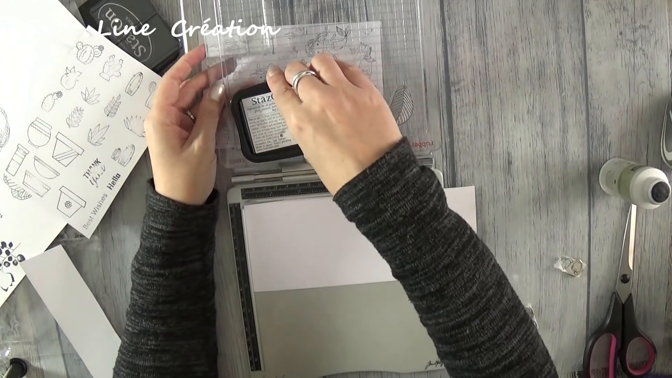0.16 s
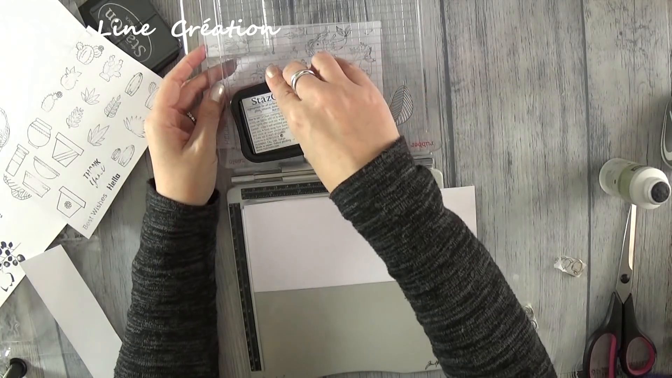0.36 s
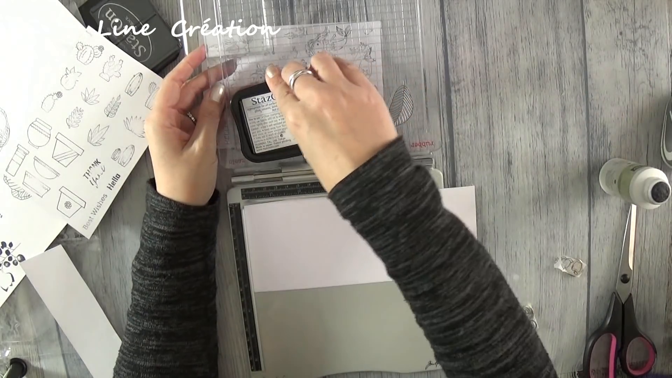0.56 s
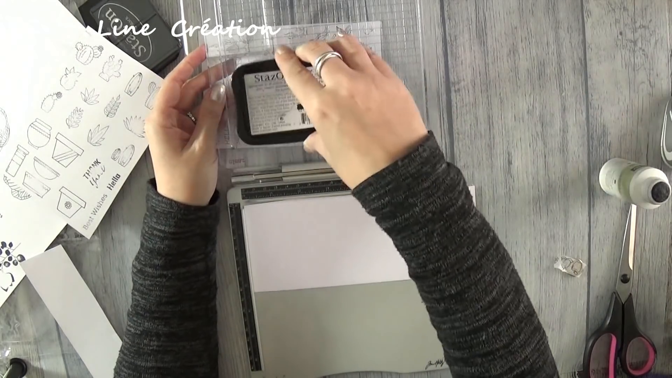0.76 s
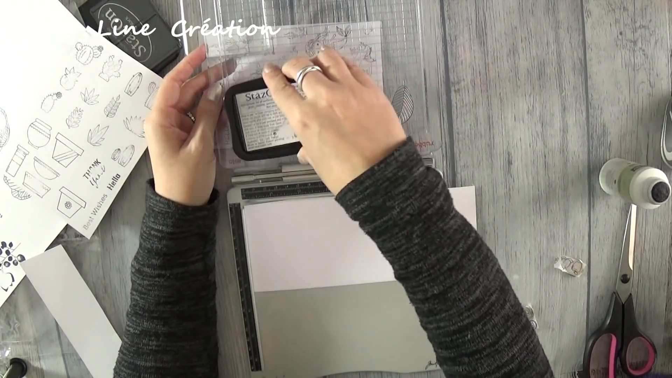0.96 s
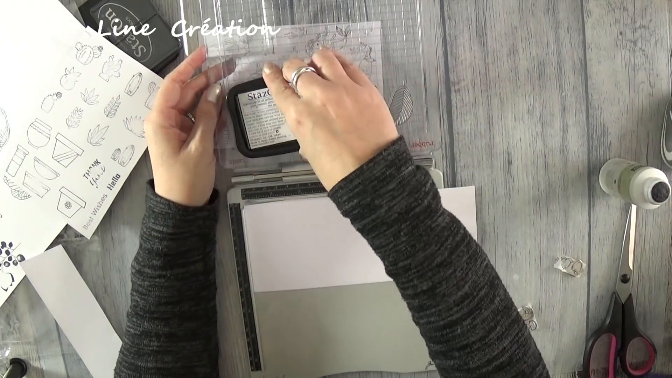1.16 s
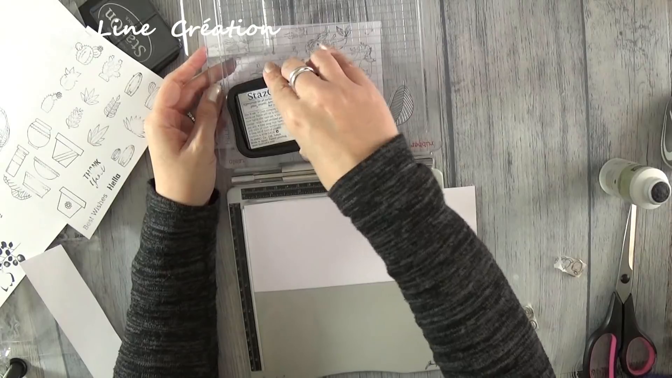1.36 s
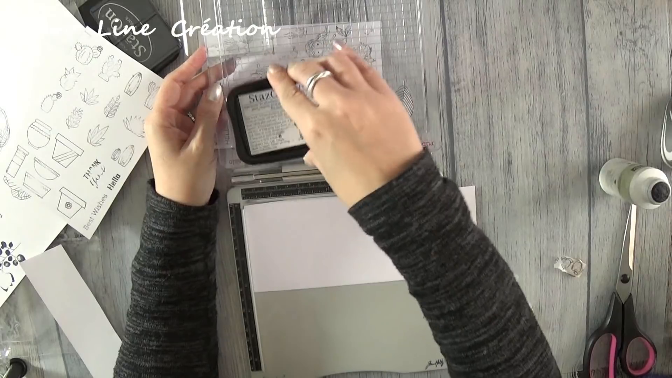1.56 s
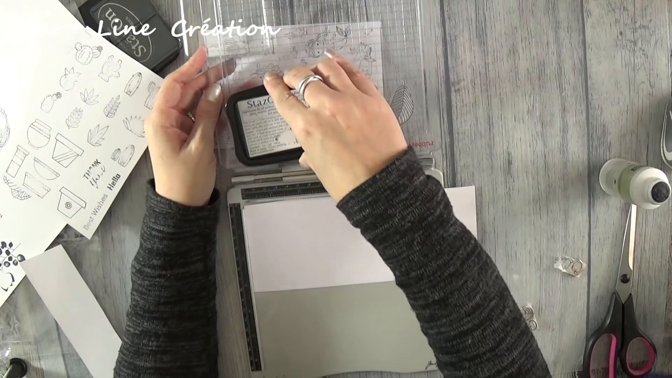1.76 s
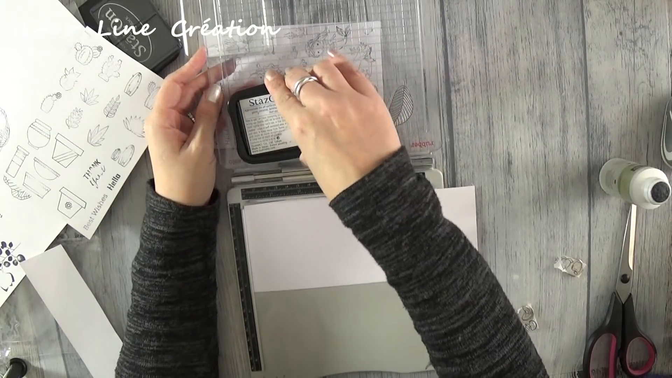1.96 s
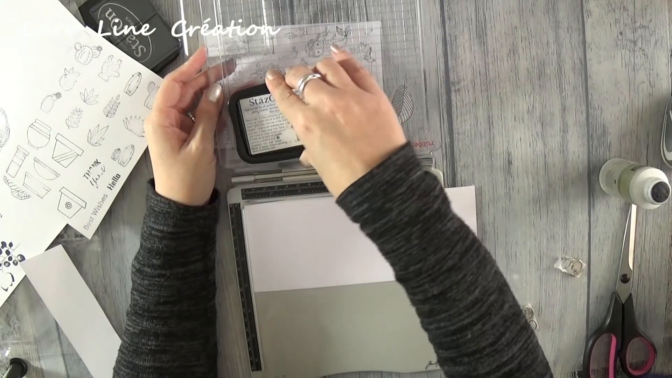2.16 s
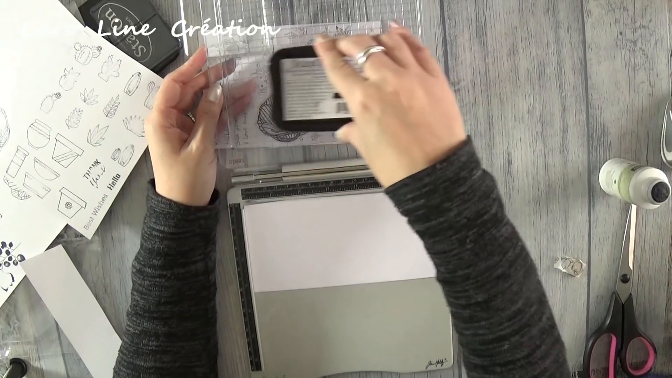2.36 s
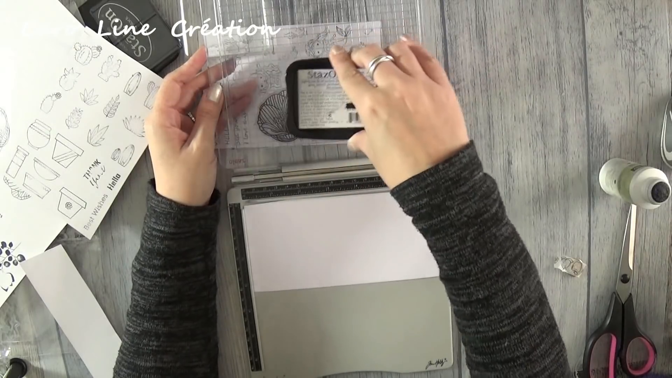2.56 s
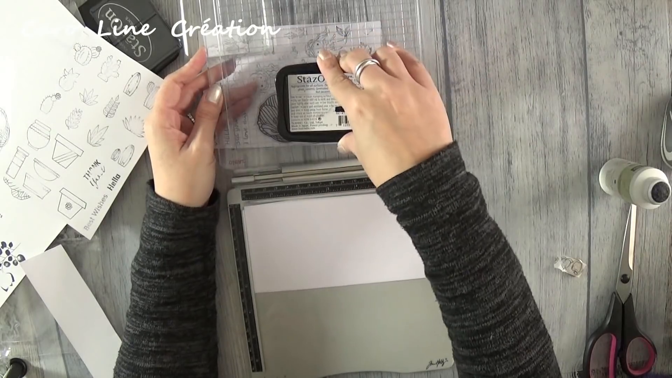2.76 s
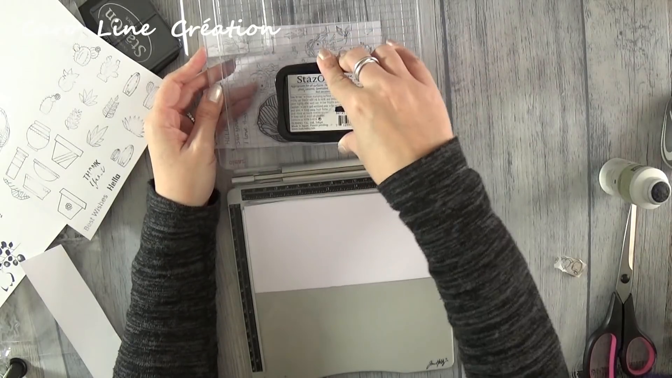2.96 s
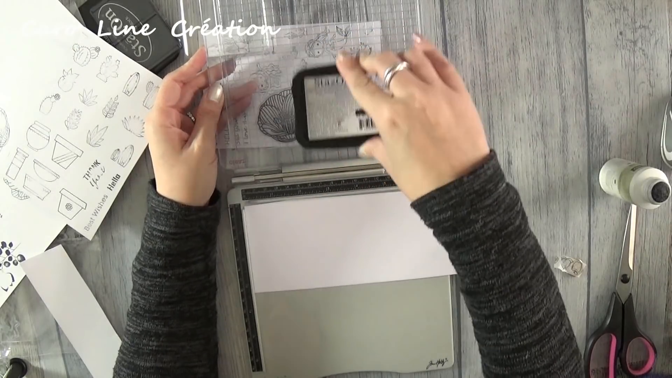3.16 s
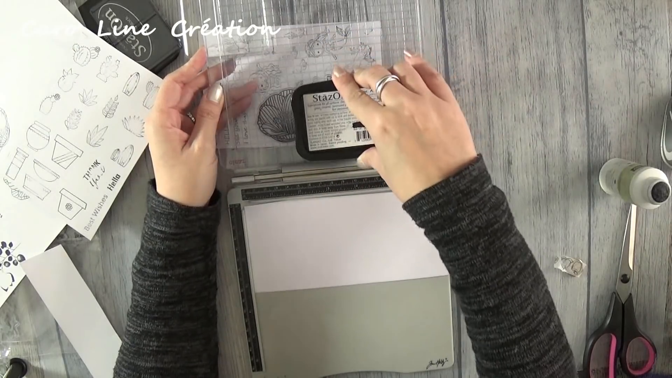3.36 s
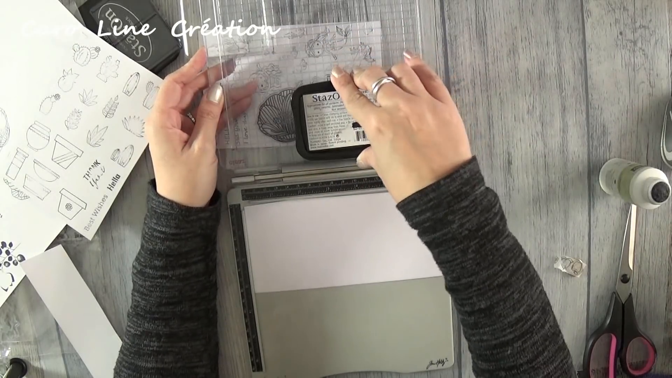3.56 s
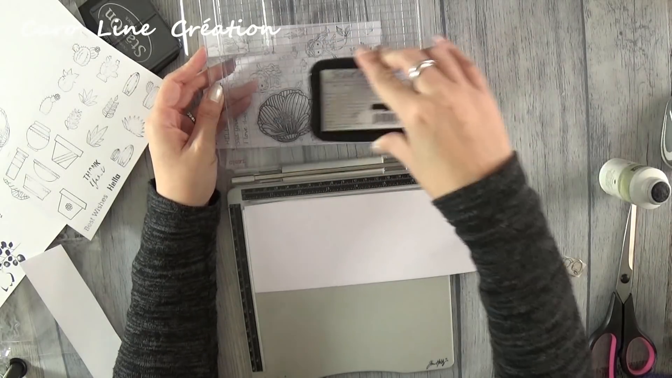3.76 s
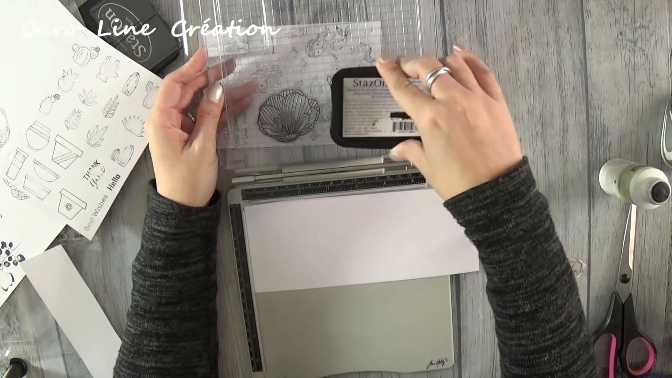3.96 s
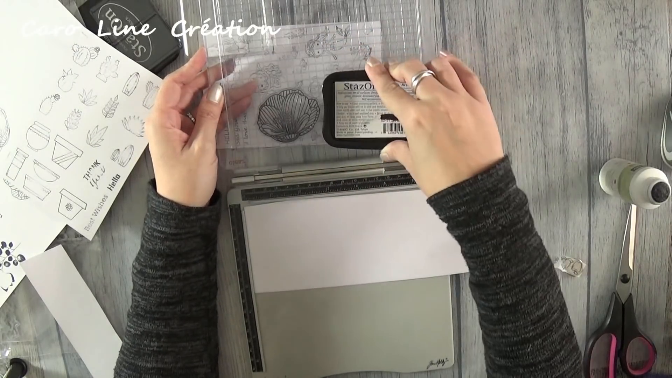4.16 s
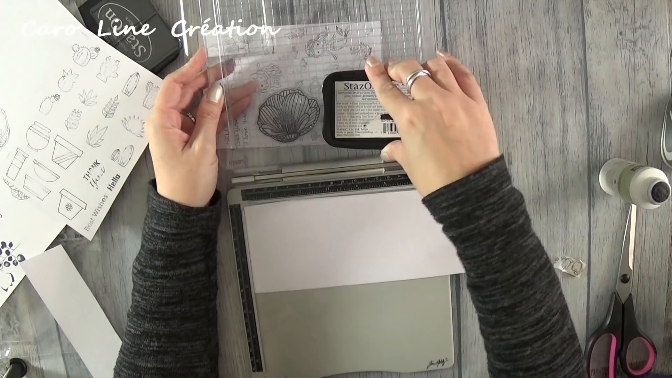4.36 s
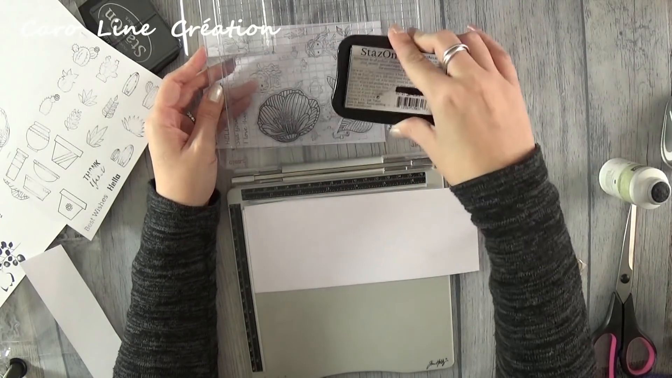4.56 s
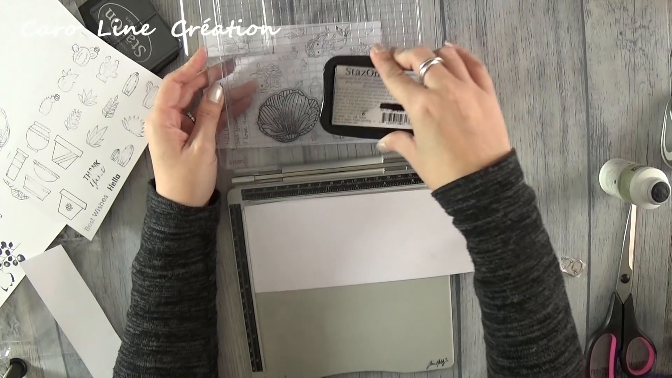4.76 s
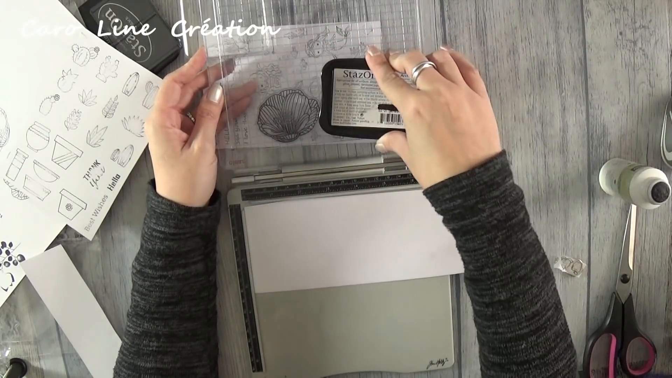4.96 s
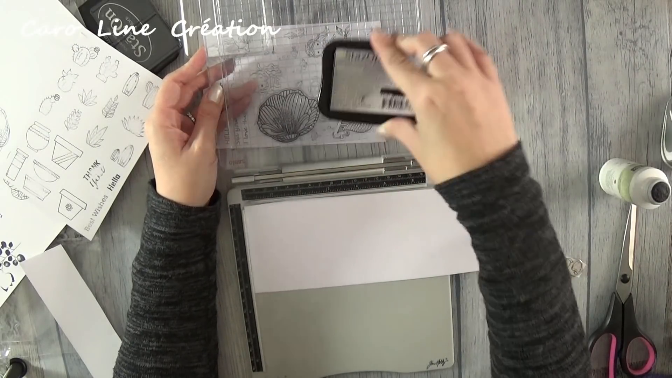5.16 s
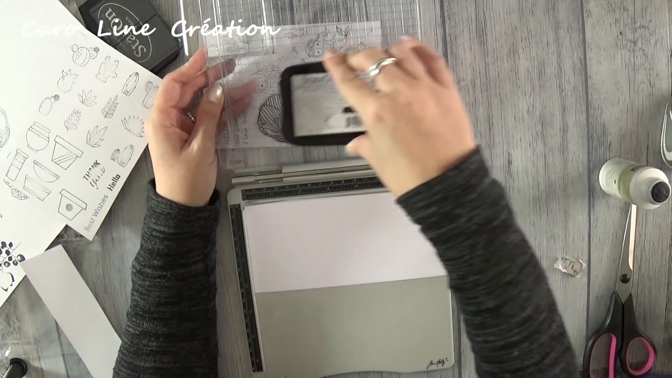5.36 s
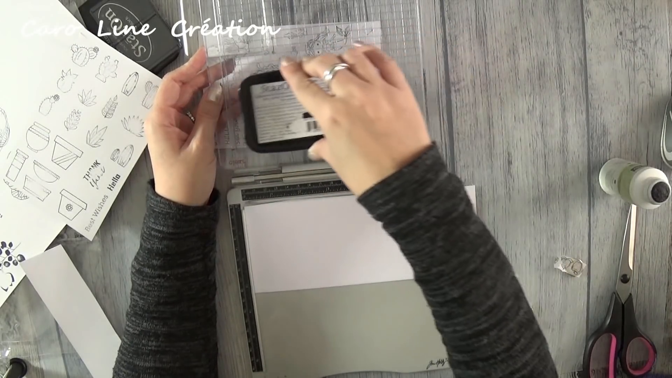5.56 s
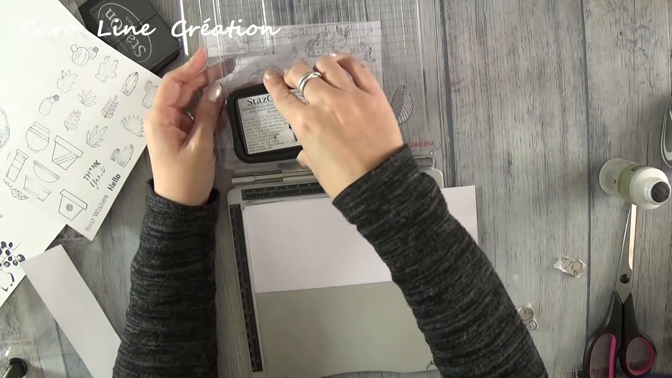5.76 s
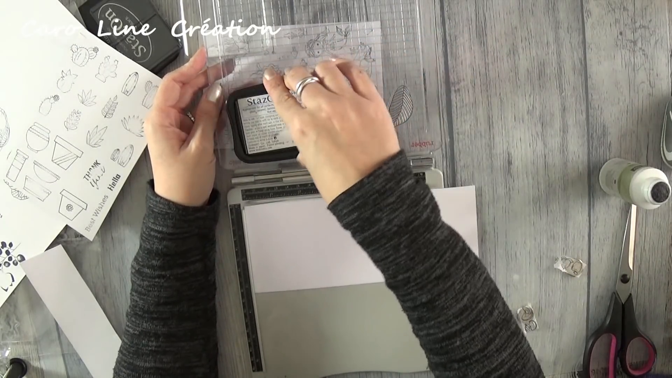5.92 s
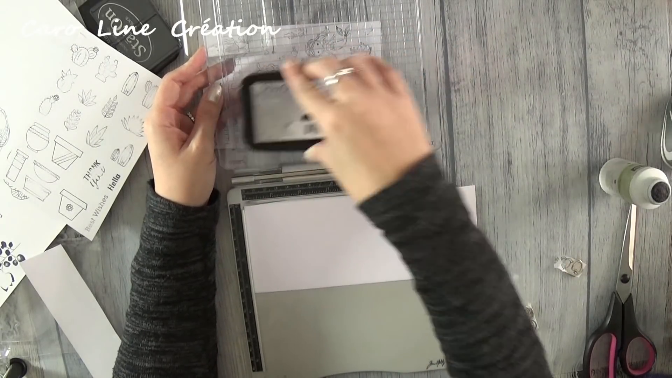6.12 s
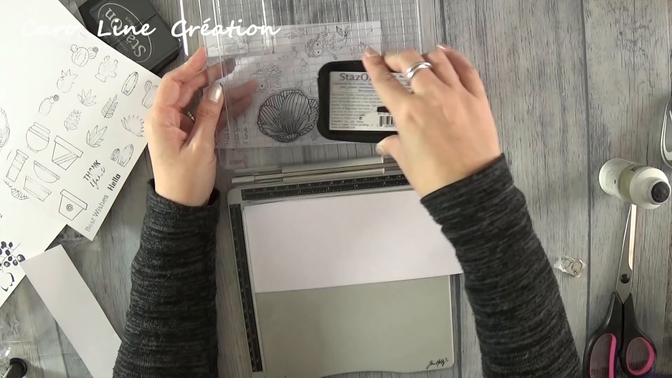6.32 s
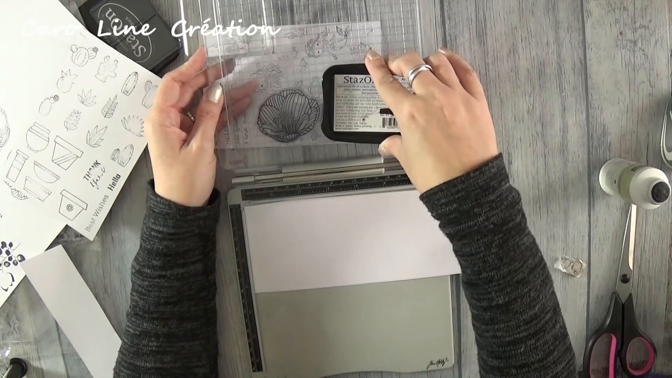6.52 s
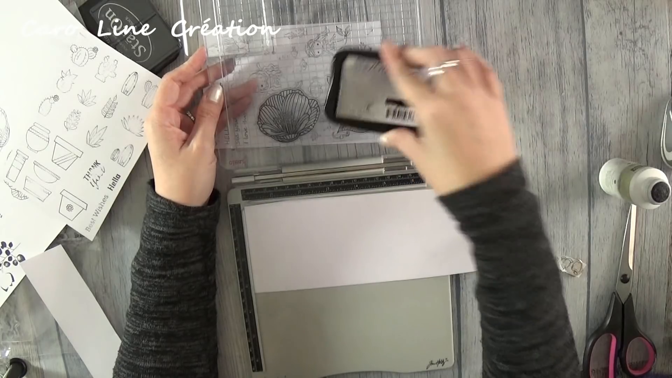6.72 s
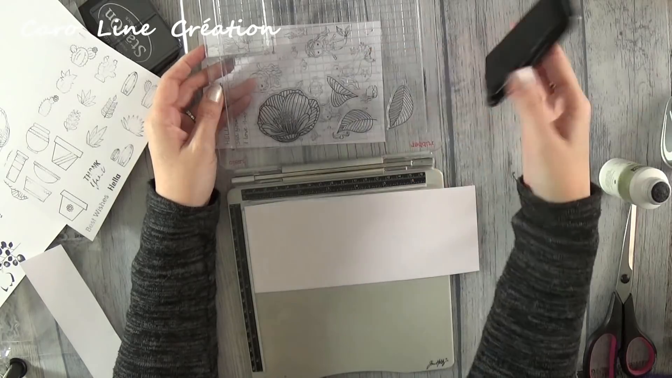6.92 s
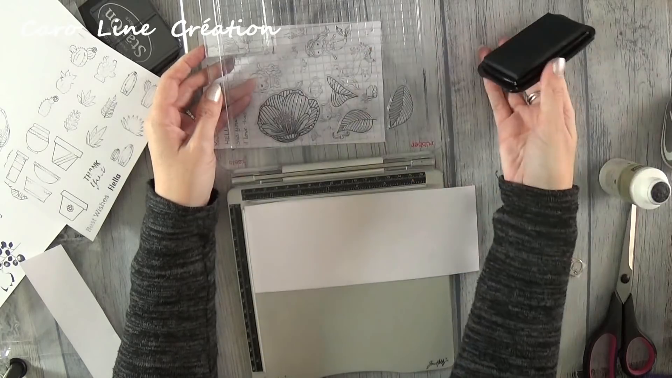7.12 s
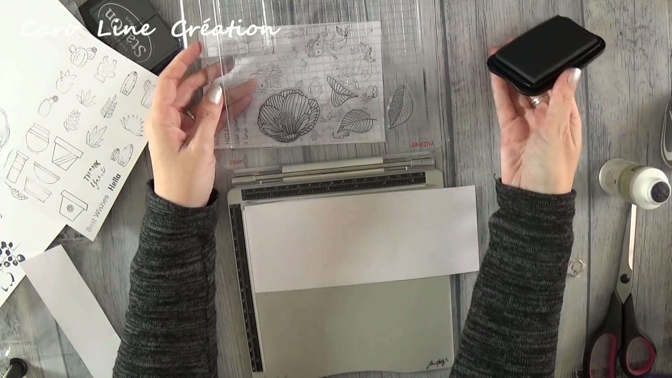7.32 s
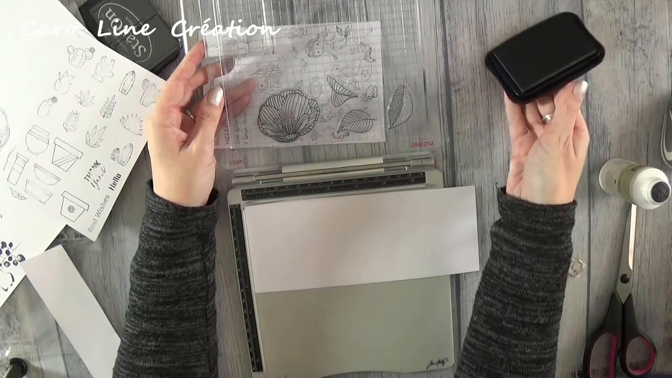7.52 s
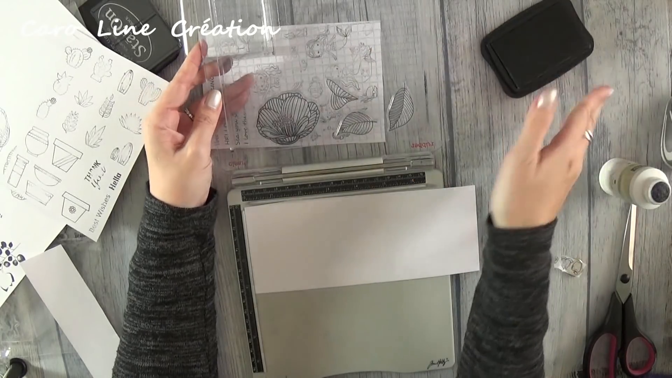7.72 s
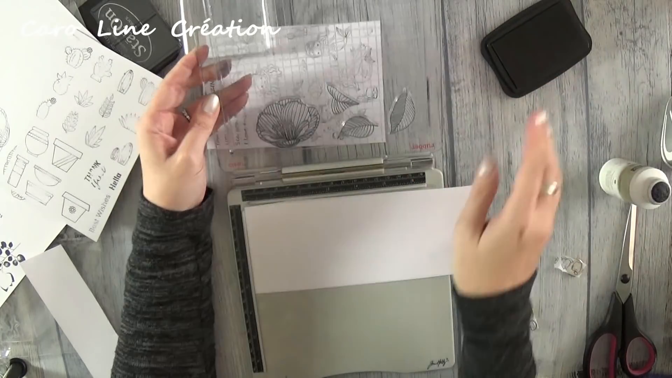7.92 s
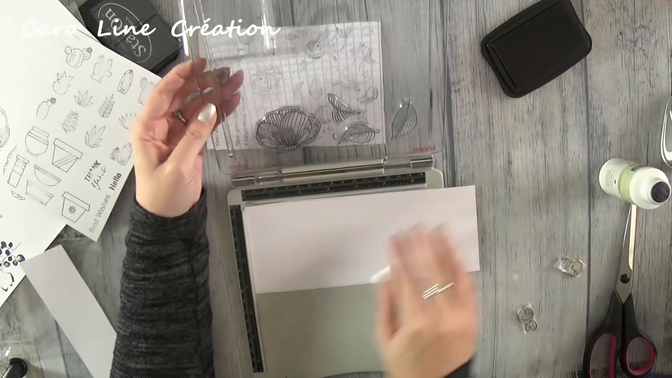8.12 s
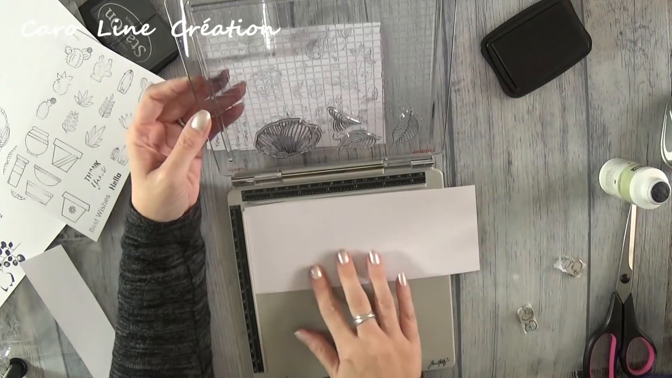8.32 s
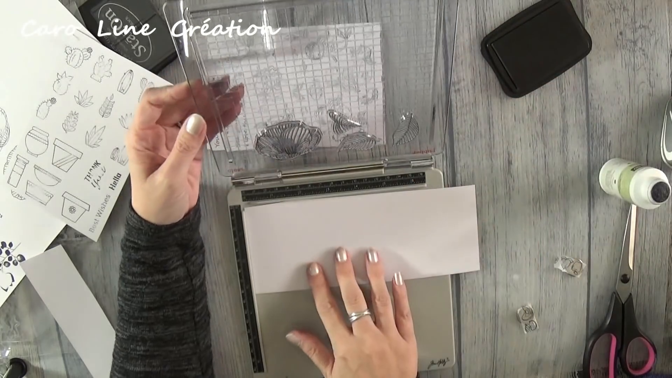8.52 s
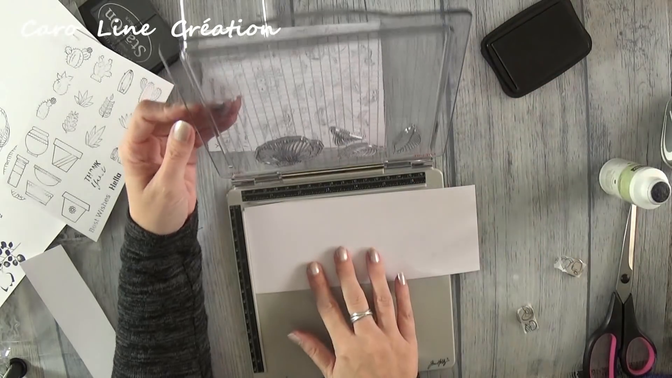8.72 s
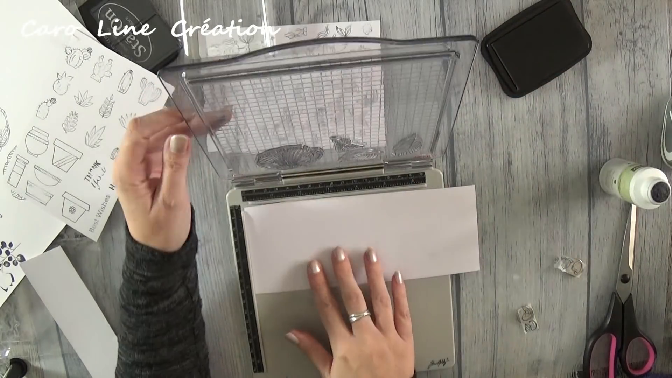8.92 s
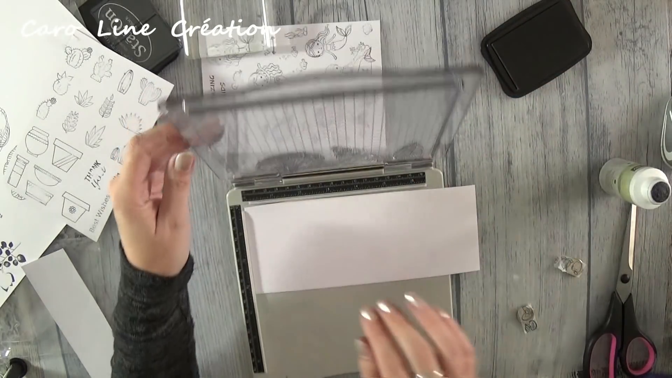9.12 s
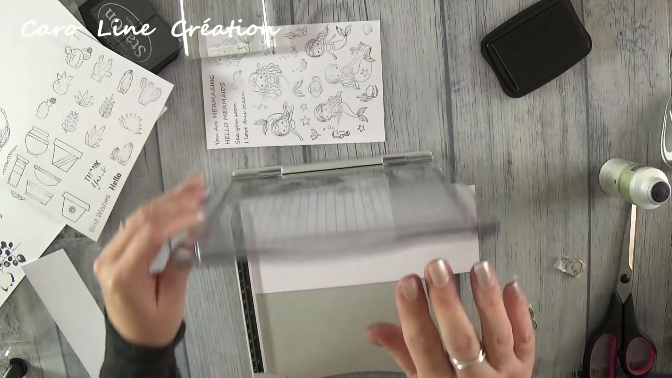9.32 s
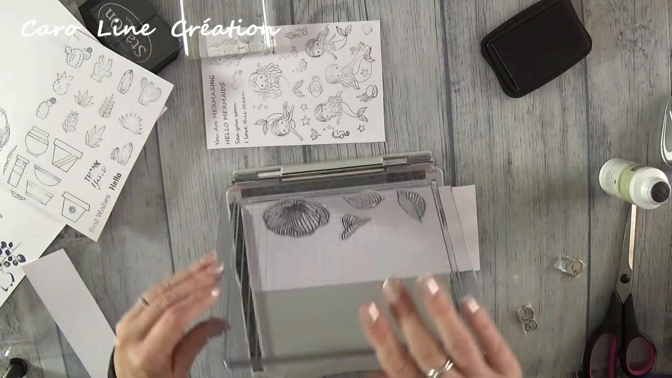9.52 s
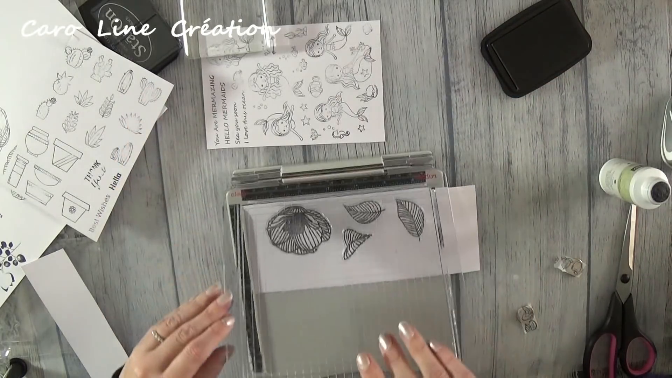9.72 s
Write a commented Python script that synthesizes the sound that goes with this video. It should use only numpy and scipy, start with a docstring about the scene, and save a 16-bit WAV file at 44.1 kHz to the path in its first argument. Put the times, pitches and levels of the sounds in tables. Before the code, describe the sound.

Soft padded taps and tacky smacks repeat at a craft table, before a hollow plastic case clacks down and a clear lid ticks over.

```python
"""An ink pad is dabbed on rubber stamps that cling to the clear lid of a stamp press, in a small room.
Each dab is a soft thud of damped lid modes; it peels off with a tacky smack of dense micro-snaps.
The pad's hollow case rings and cracks as it knocks about and bounces on its cover; small contacts tick.
Rubbing noise makes the pad's slides, a hand on paper and the lid swinging over on a ticking, creaking hinge.
Reflections surround it all, and a faint electronic whine pulses 25 times a second in the hiss."""
import sys
import numpy as np
from scipy import signal
from scipy.fft import rfft, irfft, next_fast_len
from scipy.io import wavfile

SR = 44100
rng = np.random.default_rng(int(sys.argv[2]) if len(sys.argv) > 2 else 0)


def log_audio(samples):
    """Write samples as a 16-bit WAV file to the path given in sys.argv[1]."""
    # one column per channel
    frames = np.atleast_2d(samples).T
    # limit to full scale, then quantise
    limited = np.clip(frames, -1, 1)
    pcm = np.round(limited * 32767).astype(np.int16)
    wavfile.write(sys.argv[1], SR, pcm)


N = 431298
TIME = np.arange(N) / SR
AGE = TIME[:SR // 4]  # time since a blow, s
BLOW_S = .02  # a blow's level is its energy spread over this time

# resonances of the lid on the table: [pitch_hz, relative_level_db, t60_s]
LID_MODES = [(144.8, -5, 0.096), (167.4, -2.5, 0.15), (195, -7, 0.094), (223, -10, 0.11),
             (275, -3.5, 0.055), (322, -3.5, 0.059), (395, 4, 0.055), (436, -9, 0.096), (517, -22, 0.064),
             (650.4, -5.5, 0.11), (904, 7.5, 0.025), (1050, 3, .035), (1258, -4, 0.063),
             (1460, -3.5, 0.019)]


def from_db(db):
    """Decibels to gain."""
    return 10 ** (np.asarray(db) / 20)


def rms_one(x):
    """Scale to unit rms."""
    return x / np.sqrt(np.mean(x ** 2) + 1e-20)


def at_hz(points, hz):
    """Read a table on a log-frequency axis."""
    f, value = np.transpose(points)
    return np.interp(np.log(np.maximum(hz, 1)), np.log(f), value)


def coloured(x, colour):
    """Filter a noise to a spectral curve; rms 1."""
    size = next_fast_len(N)
    hz = np.arange(size // 2 + 1) * SR / size
    spectrum = rfft(x, size) * from_db(at_hz(colour, hz))
    return rms_one(irfft(spectrum, size)[:N])


def add(out, s, db, sound):
    """Place one blow at its time and level."""
    at = round(s * SR)
    sound = sound * from_db(db) * np.sqrt(BLOW_S * SR / np.sum(sound ** 2))
    out[at:at + len(sound)] += sound[:N - at]


def ring(modes, centre_hz, focus=1.3, scatter_db=0.5, detune=0.0076, radiate=0.25):
    """Damped modes, struck a little differently each time; a contact favours those near its centre."""
    hz, db, t60 = np.transpose(modes)[:, :, None]
    strike = from_db(db + scatter_db * rng.standard_normal(hz.shape))
    gain = strike / np.hypot(1, focus * (hz / centre_hz - centre_hz / hz))
    # the highest third swings the other way
    gain = gain * np.where(np.arange(len(hz))[:, None] < 2 * len(hz) // 3, 1, -1)
    hz = hz * (1 + detune * rng.standard_normal(hz.shape))  # the grip shifts the modes
    decay = np.exp(-np.log(1000) * AGE / t60)
    vibration = np.sum(gain * np.sin(2 * np.pi * hz * AGE) * decay, axis=0)
    # small parts radiate little below their pitch
    highpass = signal.butter(2, radiate * centre_hz, "high", fs=SR, output="sos")
    return signal.sosfilt(highpass, vibration)


def crack(hz, decay_s, spread, top_hz=10500):
    """A contact: a brief, dense plastic rattle around a centre pitch."""
    fade = np.exp(-AGE / decay_s) + 1e-12
    spectrum = rfft(rng.standard_normal(len(AGE)) * fade)
    # a brief contact holds all pitches about evenly
    even = spectrum / np.abs(spectrum) ** .7
    burst = irfft(even, len(AGE)) * np.sqrt(fade)
    spread = max(spread, 1.1)
    band = signal.butter(1, [hz / spread, min(hz * spread, .45 * SR)], "band", fs=SR, output="sos")
    lowpass = signal.butter(3, min(top_hz, .45 * SR), fs=SR, output="sos")
    return signal.sosfilt(np.vstack([band, lowpass]), burst)


def grains(per_s, uneven_db):
    """Random micro-slips of uneven size."""
    sizes = from_db(uneven_db * np.minimum(rng.exponential(1, N), 4))
    return (rng.random(N) < per_s / SR) * sizes * rng.choice([-1, 1], N)


def pressure(strokes, attack_s, sag_db_per_s, release_s):
    """Each stroke swells, eases off while it lasts and dies away."""
    out = np.zeros(N)
    for s, length_s, db in strokes:
        before = np.maximum(s - TIME, 0)
        after = np.maximum(TIME - s - length_s, 0)
        held = from_db(db - sag_db_per_s * np.clip(TIME - s, 0, length_s))
        out += held * np.exp(-np.minimum(before / attack_s + after / release_s, 20))
    return out


def rub(strokes, colour, per_s, uneven_db, catch_db=2.5):
    """Friction: dense micro-slips under the level of the stroke, which catches and runs on."""
    moments = np.arange(0, TIME[-1], .009)
    catches = np.interp(TIME, moments, catch_db * rng.standard_normal(len(moments)))
    return strokes * from_db(catches) * coloured(grains(per_s, uneven_db), colour)


def hiss():
    """Room air and microphone hiss: steady coloured noise, widest in the middle of the range."""
    # spectrum of the hiss: [pitch_hz, relative_level_db]
    hiss_colour = [(30, -3.5), (80, 9), (150, -5.5), (350, -0.5), (800, 0), (2000, -4), (3500, -4),
                   (5000, -7.5), (9000, -8.5), (15500, -14)]
    # stereo width by pitch, relative only: [pitch_hz, side_over_mid_db]
    hiss_width = [(60, -8.5), (200, -9), (380, -1), (700, 1.5), (1290, 3), (2380, 0), (4400, -3.5),
                  (8120, -9), (15000, -36)]
    hiss_db, side_db = -69, -3  # side_db: whole side against whole mid
    side_colour = [(hz, at_hz(hiss_colour, hz) + db) for hz, db in hiss_width]
    mid, side = rng.standard_normal((2, N))
    mid = coloured(mid, hiss_colour)
    side = from_db(side_db) * coloured(side, side_colour)
    return from_db(hiss_db) * (mid + side * [[1], [-1]])


def whine(width_hz=35):
    """Narrow wavering electronic tones that swell in turn each cycle, alternately stronger and weaker."""
    # partials; length is the spread of a bell-shaped swell, loss applies to every second cycle:
    # [pitch_hz, level_db, moment_in_cycle_s, length_s, loss_db]
    partials = [(2073, -76.5, 0.013, 0.0069, -0.5), (2714, -73, 0.0038, 0.0034, 3),
                (2890, -80.5, 0.015, 0.0042, 1), (3364, -72, 0.003, 0.0046, 8),
                (3550, -73, 0.0029, 0.0028, 5), (4190, -71.5, 0.0049, 0.0036, 0.5),
                (8000, -91.5, .01, 0.028, -2.5), (8840, -93, .01, 0.037, 5)]
    cycle_s = .04
    out = np.zeros(N)
    smooth = signal.butter(2, width_hz, fs=SR / 50, output="sos")
    for hz, db, moment_s, length_s, loss_db in partials:
        cycle, phase_s = np.divmod(TIME - moment_s + cycle_s / 2, cycle_s)
        swell = np.exp(-.5 * ((phase_s - cycle_s / 2) / length_s) ** 2)
        gate = from_db(db - loss_db * (cycle % 2)) * swell
        slow = rms_one(signal.sosfilt(smooth, rng.standard_normal(N // 50 + 1)))
        waver = np.interp(TIME, np.linspace(0, TIME[-1], len(slow)), slow)
        out += np.sqrt(2) * gate * np.sin(2 * np.pi * hz * TIME + 0.75 * waver)
    return out


def room(x, first_s=0.001):
    """Dense reflections that die away band by band, a little different at each ear."""
    # reverberation time: [pitch_hz, t60_s]
    room_t60 = [(100, 0.45), (300, 0.17), (1000, 0.22), (2000, 0.25), (6000, 0.27), (15000, 0.26)]
    # spectrum of the reflections: [pitch_hz, relative_level_db]
    room_colour = [(70, -2), (160, -4.5), (300, 0.5), (600, -2), (1000, 0), (1800, -4.5), (4000, -2.5),
                   (10000, -3.5), (15000, -4.5)]
    # stereo width: [pitch_hz, side_over_mid_ratio]
    room_width = [(200, 0.021), (400, .14), (700, 0.23), (1500, 0.37), (4000, 0.417), (9000, 0.44),
                  (13000, 0.099)]
    room_db = -3.5
    t, edges = TIME[:SR // 2], np.geomspace(50, 18000, 13)
    spectrum = rfft(rng.standard_normal((2, len(t))))
    f = np.arange(len(t) // 2 + 1) * SR / len(t)
    onset = np.clip(t / first_s - .5, 0, 1)
    tail = 0
    for low, high in zip(edges, edges[1:]):
        hz = np.sqrt(low * high)
        fade = np.exp(-np.log(1000) * t / at_hz(room_t60, hz)) * onset
        band = irfft(spectrum * ((f >= low) & (f < high)), len(t)) * fade
        # equal energy per hertz before colouring
        band *= np.sqrt(2 * (high - low) / SR) / np.linalg.norm(band, axis=1, keepdims=True)
        mid_side = np.array([[1], [at_hz(room_width, hz)]])
        tail = tail + band * from_db(at_hz(room_colour, hz)) * mid_side
    mid, side = signal.fftconvolve(x[None], tail, axes=1)[:, :N]
    return from_db(room_db) * (mid + side * [[1], [-1]])


def swing():
    """The lid scrapes softly as it swings over."""
    # strokes of the swinging lid: [start_s, length_s, level_db]
    swing_strokes = [(8.91, 0.11, -72.5), (9.11, 0.13, -65), (9.33, 0.54, -67)]
    # spectrum of the scrape: [pitch_hz, relative_level_db]
    swing_colour = [(150, 7), (350, 7.5), (550, 3.5), (800, 3), (1200, -1), (1500, 4.5), (1850, 0.5),
                    (2800, 5.5), (4500, -3.5), (10000, -9), (15000, -30)]
    strokes = pressure(swing_strokes, attack_s=.025, sag_db_per_s=15, release_s=0.06)
    return rub(strokes, swing_colour, per_s=5000, uneven_db=1.5)


def creak():
    """Quick little slips of the hinge, halfway over, excite one resonance of the lid."""
    # creaks: [start_s, length_s, level_db]
    creak_strokes = [(9.11, 0.09, -65)]
    resonance_hz, resonance_q, slips_per_s = 1520, 14, 450
    slips = grains(slips_per_s, uneven_db=3.0) + 1e-18
    rasp = signal.lfilter(*signal.iirpeak(resonance_hz, resonance_q, fs=SR), slips)
    return pressure(creak_strokes, attack_s=.008, sag_db_per_s=5, release_s=0.013) * rms_one(rasp)


def hinge():
    """The hinge sticks and lets go as the lid comes down, and jolts the lid."""
    # slips, level before the ring and crack trims: [time_s, level_db, lid_jolt_db]
    slips = [(9.331, -56.5, -70), (9.343, -62, -60.5), (9.4035, -52.5, -68), (9.4499, -60.5, -65.5),
             (9.49, -55.5, -69), (9.54, -56, -58), (9.56, -76, -69)]
    # resonances of the hinge: [pitch_hz, relative_level_db, t60_s]
    hinge_modes = [(1100, -4, 0.017), (2300, -2, 0.02), (2540, 3, 0.02), (3600, 2, 0.014),
                   (4400, -11, .008), (6300, -17, .007), (7450, -6, 0.011)]
    slip_hz, jolt_hz = 4940, 650
    ring_db, crack_db = 1, -1
    out = np.zeros(N)
    for s, db, jolt_db in slips:
        add(out, s, db + ring_db, ring(hinge_modes, slip_hz, focus=.7, scatter_db=2.5, detune=.07))
        add(out, s, db + crack_db, crack(slip_hz, decay_s=0.0061, spread=1.8, top_hz=8700))
        add(out, s, jolt_db, ring(LID_MODES, jolt_hz, focus=3.5, scatter_db=2, detune=.05, radiate=.7))
    return out


def paper():
    """A hand brushes the sheet in the press."""
    # strokes of the hand: [start_s, length_s, level_db]
    paper_strokes = [(8.297, 0.1, -59), (8.91, 0.083, -70), (9.02, 0.042, -73)]
    # spectrum of the brushing: [pitch_hz, relative_level_db]
    paper_colour = [(200, -5), (1000, -4.5), (2500, -1), (5000, 1), (10000, 2), (13000, -1), (16000, -10)]
    strokes = pressure(paper_strokes, attack_s=0.0087, sag_db_per_s=57, release_s=0.015)
    return rub(strokes, paper_colour, per_s=25000, uneven_db=1.5)


def ticks(count=8):
    """Short contact bursts that leave the case silent: a few clear ones, and faint ones at random."""
    # clear ticks of fingers and plastic parts, and one lower creak of the swinging lid (the last row):
    # [time_s, level_db, centre_hz]
    clear = [(.0205, -63.5, 3900), (0.097, -69, 5350), (0.4857, -68, 7500), (1.7736, -69.5, 4500),
             (3.865, -64.5, 3730), (5.727, -65.5, 3870), (6.921, -66.5, 4800), (6.9596, -66, 6860),
             (7.0637, -66.5, 6000), (7.325, -66, 5500), (7.456, -59.5, 3570), (7.509, -61, 2520),
             (8.651, -64.5, 3900), (9.0857, -63.5, 3860), (9.096, -62, 1460)]
    touch_db, touch_hz, spread_octaves = -74.5, 4300, 0.32  # the faint ones
    out = np.zeros(N)
    faint = []
    for when, pitch in rng.random((count, 2)):
        hz = touch_hz * 2 ** (spread_octaves * (2 * pitch - 1))
        faint.append((when * TIME[-1], touch_db, hz))
    for s, db, hz in list(clear) + faint:
        add(out, s, db, crack(hz, decay_s=0.0041, spread=1.16, top_hz=11530))
    return out


def slide():
    """The pad turns and slides in the fingers."""
    # strokes of the pad: [start_s, length_s, level_db]
    slide_strokes = [(7.07, .13, -71), (7.38, 0.13, -69.5), (7.515, .1, -62.5), (7.67, 0.14, -57)]
    # spectrum of the sliding: [pitch_hz, relative_level_db]
    slide_colour = [(120, -55), (200, -19), (231, 4.5), (304, -9), (437, -13.5), (906, -4), (1980, 8.5),
                    (2420, 2), (4410, -2), (5300, -10.5), (8980, -3), (15500, -22)]
    strokes = pressure(slide_strokes, attack_s=0.015, sag_db_per_s=17.5, release_s=.03)
    return rub(strokes, slide_colour, per_s=2500, uneven_db=1.5, catch_db=4.5)


def case_ring(hz):
    """One stroke on the pad's hollow case."""
    # resonances of the case: [pitch_hz, relative_level_db, t60_s]
    case_modes = [(891, -1, 0.028), (1325, -10.5, 0.011), (1470, 6, 0.0073), (1644, 2, 0.026),
                  (1837, 6.5, 0.016), (2240, 2.5, 0.0059), (2710, 2, 0.014), (3115, 7, 0.015)]
    return ring(case_modes, hz, focus=2.6, scatter_db=1.5, detune=0.02, radiate=0.51)


def case_crack(hz):
    """Hard plastic meets hard plastic."""
    return crack(hz, decay_s=.0022, spread=1.6, top_hz=9500)


def drop(count=3):
    """The pad lands on its cover and bounces to rest; the first landing booms in the table."""
    # each flight is shorter and each landing weaker
    drop_s, first_flight_s, restitution = 7.7574, .0603, .35
    drop_db, bounce_loss_db, loss_power = -26.5, 6.5, 1.64
    ring_hz, crack_hz, shake_hz, boom_hz = 2135, 5500, 700, 286
    crack_db, shake_db, boom_db = -4, -18.5, -16  # relative to the landing
    shake_growth_db = 7  # per bounce, as the pad lands flatter
    out, s = np.zeros(N), drop_s
    add(out, s, drop_db + boom_db, ring(LID_MODES, boom_hz, focus=6.0, scatter_db=1.0))
    for bounce in range(count):
        db = drop_db - bounce_loss_db * bounce ** loss_power
        shake = ring(LID_MODES, shake_hz, focus=.6, scatter_db=1.5, radiate=.1)
        add(out, s, db, case_ring(ring_hz))
        add(out, s, db + crack_db, crack(crack_hz, decay_s=0.005, spread=1.74, top_hz=11600))
        add(out, s, db + shake_db + shake_growth_db * bounce, shake)
        s += first_flight_s * restitution ** bounce
    return out


def clacks():
    """The hollow case rings and cracks, and shakes what it lands on."""
    # hard knocks of the case: [time_s, ring_level_db, ring_centre_hz, crack_centre_hz]
    knocks = [(0.3112, -55.5, 1110, 2440), (2.7995, -43, 1070, 6500), (2.8594, -42, 1660, 3850),
              (3.2812, -51.5, 1020, 1880), (7.197, -61.5, 2070, 3000), (7.2273, -48, 1790, 2980),
              (7.2310, -52.5, 1880, 2300), (7.3669, -55, 1900, 3520), (7.682, -57.5, 1880, 2800),
              (7.699, -62, 1890, 2500), (7.7484, -40.5, 1910, 3380)]
    # a sharper contact cracks louder against the ring and shakes the table less
    reference_hz = 4000
    crack_db, crack_db_per_octave = -5, 10.5
    shake_db, shake_db_per_octave = -17, -10
    out = np.zeros(N)
    for s, db, ring_hz, crack_hz in knocks:
        sharpness = np.log2(crack_hz / reference_hz)  # octaves
        shake = ring(LID_MODES, centre_hz=650, focus=1.0, scatter_db=3.0)
        add(out, s, db, case_ring(ring_hz))
        add(out, s, db + crack_db + crack_db_per_octave * sharpness, case_crack(crack_hz))
        add(out, s, db + shake_db + shake_db_per_octave * sharpness, shake)
    return out


def peels(release_s=0.0047):
    """Ink threads snap ever harder until the pad lets go and the lid springs back."""
    # the inky pad comes unstuck after a dab: [release_time_s, level_db, swell_s]
    releases = [(0.687, -47, 0.011), (1.433, -49, 0.0043), (2.229, -52.5, 0.0044), (3.069, -46.5, 0.0099),
                (3.726, -48.5, 0.0082), (4.461, -53.5, 0.0095), (4.474, -54, 0.0076), (5.136, -54, 0.0014),
                (5.156, -50.5, 0.0073), (6.733, -56.5, 0.0047)]
    # spectrum of the smack: [pitch_hz, relative_level_db]
    peel_colour = [(59, -50), (100, -34), (519, -7.5), (861, 3), (1180, -5.5), (2130, 1), (3180, -2.5),
                   (4280, -5), (5400, -11.5), (8230, -10.5), (15500, -29)]
    strain, recoil = np.zeros(N), np.zeros(N)
    for s, db, swell_s in releases:
        near = slice(int((s - .1) * SR), int((s + .1) * SR))
        before = np.maximum(s - TIME[near], 0)
        after = np.maximum(TIME[near] - s, 0)
        strain[near] += from_db(db) * np.exp(-after / release_s) / (1 + (before / swell_s) ** 1.88)
        add(recoil, s, db - 20.0, ring(LID_MODES, centre_hz=169, focus=0.73))
    return strain * coloured(grains(per_s=9000, uneven_db=1.0), peel_colour) + recoil


def thuds(squash_s=0.006, squash_db=-13):
    """Soft blows set lid and table booming, with a short knock on top; the felt squashes just before."""
    # blows on the lid; the firmer the contact, the higher its centre: [time_s, boom_level_db, centre_hz]
    blows = [(0.203, -58.5, 155), (1.119, -50.5, 230), (1.871, -49, 296), (1.873, -56, 880),
             (2.097, -70.5, 255), (2.713, -58.5, 216), (3.44, -51.5, 154), (4.154, -35.5, 450),
             (4.890, -39, 395), (5.821, -52.5, 190), (6.482, -51, 197), (8.517, -60.5, 500),
             (8.545, -62, 425), (8.898, -68, 200), (9.068, -65.5, 490), (9.108, -66.5, 348),
             (9.343, -58, 166)]
    # the knock at the reference blow, then how it grows with strength and firmness
    reference_db, reference_hz = -53, 250
    knock_ref_db, knock_hz, knock_follows, db_per_octave = -60, 1250, 0.84, 3.5
    knock_s, knock_top_hz = 0.006, 5200  # a softer blow draws its knock out and dulls it
    out = np.zeros(N)
    for s, db, hz in blows:
        firmness = hz / reference_hz
        strength_db = knock_follows * (db - reference_db)
        knock_db = knock_ref_db + strength_db + db_per_octave * np.log2(firmness)
        top_hz = knock_top_hz * min(firmness, 1) ** .5
        knock = crack(knock_hz, decay_s=knock_s / firmness, spread=1.69, top_hz=top_hz)
        squash = crack(knock_hz, decay_s=0.027, spread=1.6, top_hz=7000)
        add(out, s, db, ring(LID_MODES, hz, focus=2.65, scatter_db=1.5))
        add(out, s, knock_db, knock)
        add(out, s - squash_s, knock_db + squash_db, squash)
    return out


def scene():
    """The press lies under the microphone, the pad's case a little to the right."""
    press = swing() + creak() + hinge() + paper() + ticks() + peels() + thuds()
    pad = slide() + drop() + clacks()
    pad_pan_db = 0.5
    direct = press + pad * from_db([[-pad_pan_db], [pad_pan_db]])
    return direct + room(press + pad) + hiss() + whine()


def record(dry, bass_hz=136, leak_db=-20):
    """The microphone drops the bass to a low shelf; the top is cut."""
    cutoff_hz = 15800
    highpass = signal.butter(7, bass_hz, "high", fs=SR, output="sos")
    thin = signal.sosfilt(highpass, dry) + from_db(leak_db) * dry
    return signal.sosfilt(signal.ellip(10, .1, 80, cutoff_hz, fs=SR, output="sos"), thin)


dry = scene()
out = record(dry)
log_audio(out)
```